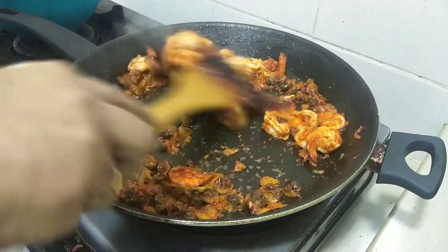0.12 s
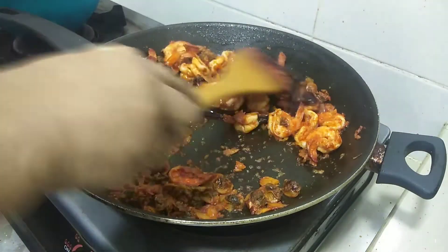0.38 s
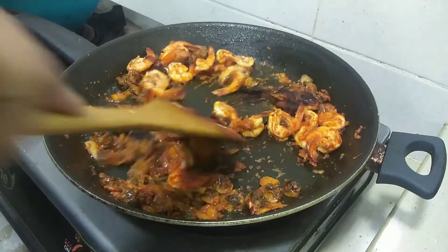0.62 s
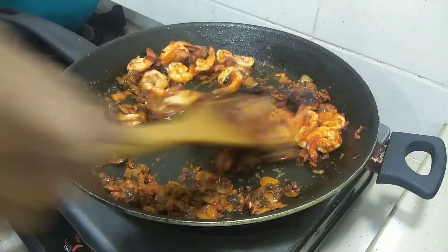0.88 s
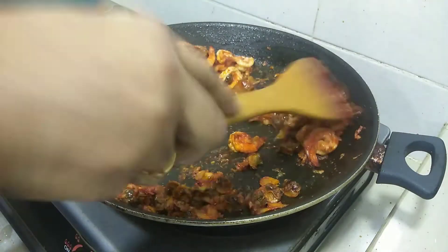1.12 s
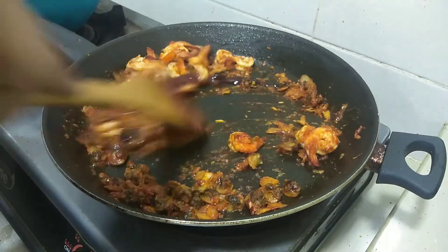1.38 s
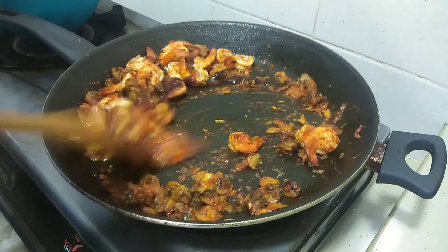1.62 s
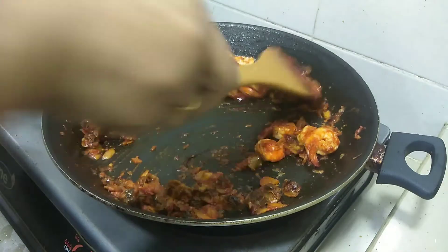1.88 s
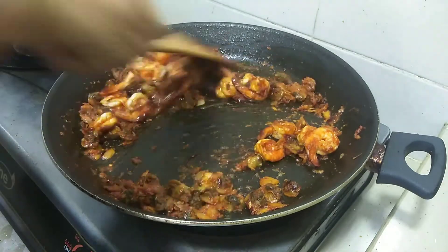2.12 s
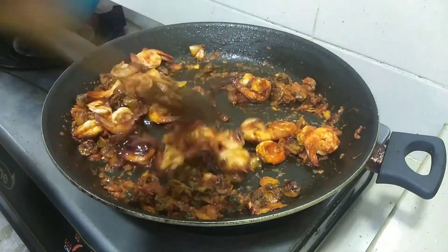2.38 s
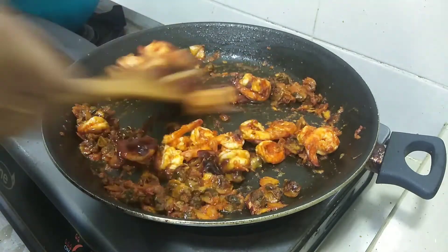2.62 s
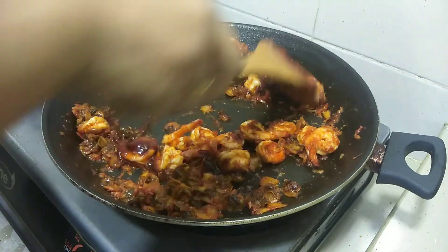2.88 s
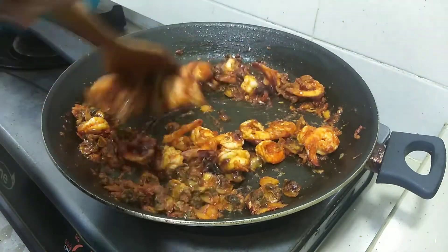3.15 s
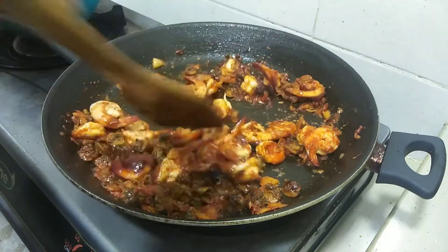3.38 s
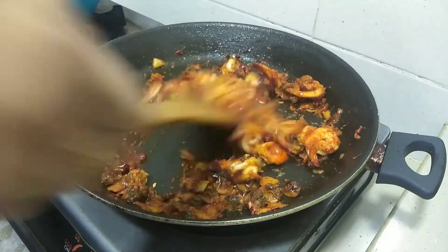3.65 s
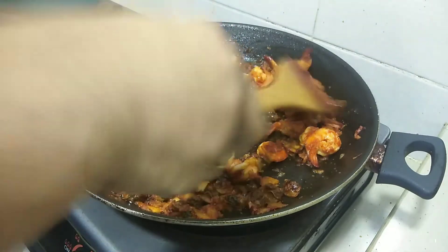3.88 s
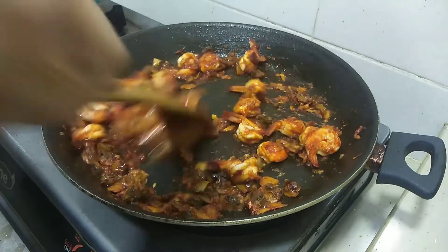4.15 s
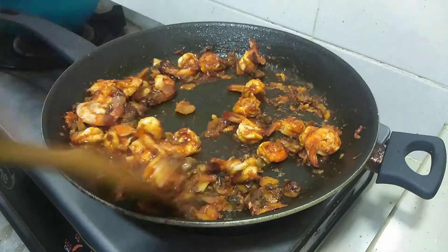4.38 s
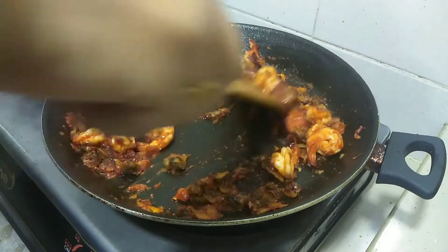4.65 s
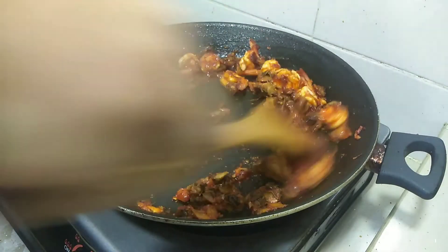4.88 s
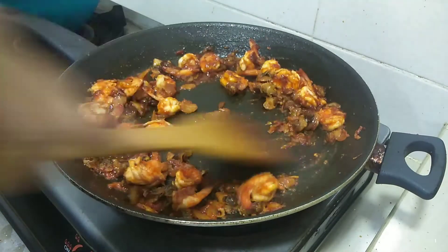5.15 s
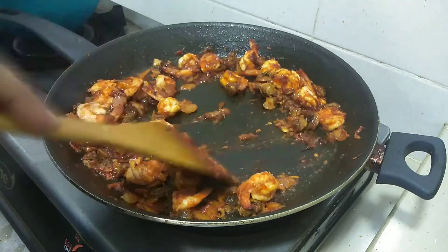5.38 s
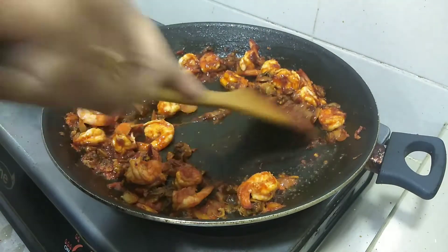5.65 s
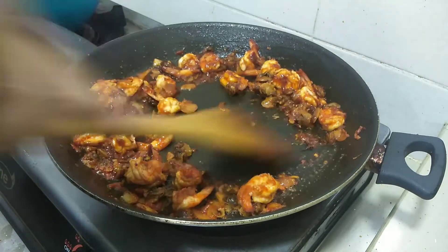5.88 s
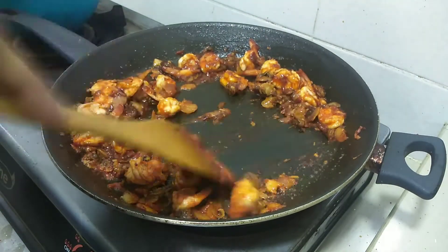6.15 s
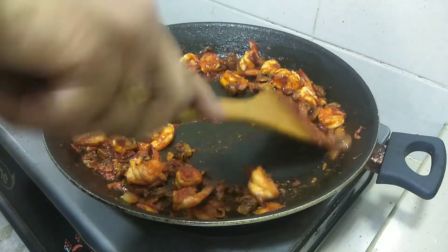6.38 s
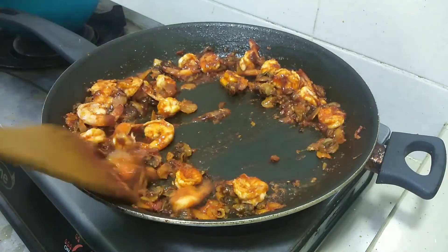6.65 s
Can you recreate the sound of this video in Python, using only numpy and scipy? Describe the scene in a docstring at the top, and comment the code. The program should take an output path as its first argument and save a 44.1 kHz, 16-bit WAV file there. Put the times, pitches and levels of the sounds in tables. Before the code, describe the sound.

Close, bright frying sputter runs throughout, swelling as food is turned; wood rubs the pan and knocks ring briefly over a faint low rumble.

```python
"""Seafood fries in a pan on a gas stove, heard close by through two ports in a tiled kitchen.
Hot fat crackles densely: bands of random bursts sputter partly together, partly each on its own, and swell
as food is turned. A wooden spatula scrapes, as coloured noise. The spatula landing, or the pan slamming on
the stove grid, knocks: briefly ringing modes, echoed by the walls.
Low noise shaped by room resonances rumbles beneath."""
import sys
import numpy as np
from scipy import signal
from scipy.fft import rfft, irfft
from scipy.io import wavfile
from scipy.ndimage import uniform_filter1d

SR = 44100
rng = np.random.default_rng(int(sys.argv[2]) if len(sys.argv) > 2 else 0)


def master_out(mix):
    """Clip the mix to full scale and print it as 16-bit PCM to the path in sys.argv[1]."""
    frames = np.transpose(np.atleast_2d(mix))
    ceiling = np.clip(frames, -1, 1)
    pcm = np.round(ceiling * 32767).astype(np.int16)
    wavfile.write(sys.argv[1], SR, pcm)


def gain_from_db(level_db):
    """Turn a decibel level (scalar or array-like) into a linear amplitude factor."""
    decades = np.asarray(level_db, float) / 20
    return 10 ** decades


N = 298557

# knocks of the pan: the spatula landing, or the pan slamming on the stove grid;
# levels are relative, the pitch is the one excited best:
# start_s, level_db, best_pitch_hz, spread_octaves, ring_length_factor
BLOWS = [(0.86, -20, 1190, 1.34, 0.72), (0.971, -24, 1490, 2.1, 0.15), (1.169, -16, 377, 1.96, 0.64),
         (1.199, -24, 387, 2.2, 0.54), (1.656, -13.5, 362, 1.97, 0.65), (1.706, -9, 1220, 1.65, 0.3),
         (1.729, -27, 358, 1.1, 0.26), (2.575, -16, 800, 1.2, 0.32), (2.624, -13.5, 1170, 1.34, 0.21),
         (3.008, -36.5, 600, 1.2, 0.22), (3.022, -26.5, 360, 0.38, 0.36), (3.596, -15, 360, 2.04, 0.76),
         (3.642, -8, 1250, 1.8, 0.13), (3.664, -24, 638, 1.5, 0.26), (4.461, -18, 360, 2.3, 0.28),
         (4.511, -8, 1230, 2.2, 0.2), (4.534, -24.5, 292, 2.2, 0.3), (4.818, -30, 570, 1.9, 0.19),
         (6.11, -23.5, 3200, 1.4, 0.16)]


def curves(table):
    """Columns of a table after its times, interpolated to one value a sample."""
    time_s, *columns = np.transpose(table)
    return [np.interp(np.arange(N) / SR, time_s, column) for column in columns]


def bins():
    """Frequencies of the spectrum lines in Hz, at least 1."""
    return np.maximum(np.arange(N // 2 + 1) * SR / N, 1)


def shape(points):
    """Gain on every spectrum line from (Hz, dB) points, interpolated over log frequency."""
    hz, db = np.transpose(points)
    return gain_from_db(np.interp(np.log(bins()), np.log(hz), db))


def colour(x, gain):
    """Filter by a gain on every spectrum line."""
    return irfft(rfft(x) * gain, N)


def unit(x):
    """Scale to rms 1."""
    return x / np.sqrt(np.mean(x ** 2))


def walk(rate_hz):
    """Random levels of about rms 1, held 1 / rate_hz and slewed twice."""
    hold = int(SR / rate_hz)
    steps = np.repeat(rng.standard_normal(N // hold + 1), hold)
    slewed = uniform_filter1d(uniform_filter1d(steps, hold), hold)
    return 1.44 * slewed[:N]


def crackle(spread_db):
    """Two unrelated streams of one tiny burst a sample, a few larger than the rest."""
    size = np.minimum(rng.exponential(size=(2, N)), 6.5)
    return rng.standard_normal((2, N)) * gain_from_db(spread_db * size)


def ports(pair):
    """Two unrelated streams heard as left and right: alike in the bass, unlike in the treble."""
    alike_hz = 925  # above this the two ports hear different things
    alike = 1 / (1 + (bins() / alike_hz) ** 2)
    mid = colour(pair[0], np.sqrt(1 + alike))
    side = colour(pair[1], np.sqrt(1 - alike))
    return np.array([mid + side, mid - side]) / np.sqrt(2)


def patchy(x, patchy_db):
    """Random gain patches in time and pitch make the noise uneven."""
    z = signal.stft(x, nperseg=1024)[2]
    patches = uniform_filter1d(rng.standard_normal(z.shape), size=3, axis=1)
    patches = uniform_filter1d(patches, size=2, axis=2)
    gain = gain_from_db(patchy_db * np.minimum(unit(patches), 2.2))
    varied = signal.istft(z * gain, nperseg=1024)[1][:, :N]
    return unit(varied) * np.sqrt(np.mean(x ** 2))  # overall level kept


def room(x, t60_s, damp_hz):
    """Tiled walls: a dense decaying echo, its treble damped."""
    t = np.arange(N) / SR
    envelope = 1000 ** (-t / t60_s) * np.minimum(t / 0.0036, 1)
    tail = ports(rng.standard_normal((2, N)) * envelope)[:, :SR // 2]
    tail = signal.lfilter(*signal.butter(1, damp_hz, fs=SR), tail)
    tail = unit(tail) / np.sqrt(SR / 2)  # unit energy
    return signal.fftconvolve(x, tail, axes=1)[:, :N]


def swells():
    """Power of the rumble: a wavering bed plus smooth humps."""
    # brief swells, length at half amplitude: middle_s, length_s, level_db
    humps = [(.66, .08, -41), (0.767, 0.029, -41), (0.965, .07, -41.5), (1.723, 0.072, -41),
             (2.547, 0.058, -39), (2.675, 0.054, -40), (3.22, 0.079, -39), (3.36, 0.063, -46),
             (3.67, 0.096, -31.5), (4.494, 0.14, -35), (4.627, 0.052, -39), (4.807, 0.035, -39),
             (4.94, 0.049, -38), (5.35, 0.12, -40.5), (5.825, 0.079, -43), (5.937, 0.041, -38),
             (6.36, .09, -40)]
    bed_db, waver_db, wavers_per_s = -45, 3, 18
    middle_s, length_s, level_db = np.transpose(humps)[:, :, None]
    phase = np.clip((np.arange(N) / SR - middle_s) / (2 * length_s), -.5, .5)
    hump = np.cos(np.pi * phase) ** 2
    bed = gain_from_db(bed_db + waver_db * walk(wavers_per_s))
    return bed ** 2 + np.sum((gain_from_db(level_db) * hump) ** 2, axis=0)


def rumble():
    """Low noise that the room's resonances pick out, the same in both ports."""
    # room resonances, relative levels: pitch_hz, width_hz, level_db
    resonances = [(85.7, 12.7, 2.5), (120.2, 30.3, -3.5), (170, 20.5, -10), (60, 32, -27), (261, 32, -17.5)]
    power = 0
    for pitch_hz, width_hz, level_db in resonances:
        detune = 2 * (bins() - pitch_hz) / width_hz
        power = power + gain_from_db(level_db) ** 2 / (1 + detune ** 2) ** 1.48
    low = unit(colour(rng.standard_normal(N), np.sqrt(power)))
    loudness = np.sqrt(uniform_filter1d(low ** 2, int(.09 * SR)))
    even = low / loudness ** 0.64  # a steady source keeps it even
    return unit(even) * np.sqrt(swells())


def drag():
    """Wood and food rubbing the pan floor in uneven slips: crackling noise with a wavering level."""
    # scrape spectrum, relative: pitch_hz, level_db_per_hz
    scrape = [(150, -26), (260, -4.5), (460, -10), (600, -6), (890, -11.5), (1280, -5.5), (1700, -15.5),
              (3000, -13)]
    level_db, wander_db = -40, .6
    slips = crackle(2.4) * gain_from_db(2.6 * walk(30))
    rub = unit(colour(slips, shape(scrape)))
    return patchy(ports(rub), 5.3) * gain_from_db(level_db + wander_db * walk(3.04))


def knocks():
    """Each blow cracks dryly, then it and its chatter on the stove grid ring the pan modes it excites best."""
    # pan modes, relative levels, decay before each blow shortens it: pitch_hz, level_db, t60_s
    pan_modes = [(122, -24, 0.1), (207, -11, 0.04), (269, -21, 0.068), (358, -9, 0.45), (438, -12, 0.24),
                 (558, -18, 0.078), (630.4, -5.5, 0.22), (732, 3, 0.046), (939, -13, 0.43), (1007, -6, 0.2),
                 (1072, 6, 0.022), (1247, -0.5, 0.1), (1395, 0.5, 0.065), (1600, -3.5, 0.045),
                 (1888, 5.5, 0.052), (2183, 8, 0.042), (2690, 4, .08), (3160, 11, 0.058),
                 (3691, 19.5, 0.011), (4150, 12.5, 0.079), (4886, 5, 0.29), (5180, 4, 0.19),
                 (6200, 10, 0.092), (6640, 12, 0.045)]
    delay_s = .0015  # every blow sounds this long after its listed start
    chatter_s = 0.014  # decay of the pan's rattle on the stove grid
    hz, mode_db, t60_s = np.transpose(pan_modes)[:, :, None]
    t, out = np.arange(int(.3 * SR)) / SR, np.zeros((2, N + SR))
    # a wide pan reaches the two ports with phases that part as pitch rises, neighbouring modes opposite ways
    lean = (-1) ** np.arange(len(pan_modes))[:, None] * np.minimum(hz / 1700, .68)
    part = np.array([lean, -lean])
    for start_s, level_db, best_hz, spread_octaves, ring in BLOWS:
        away = np.log2(hz / best_hz) / spread_octaves
        # a hard edge hardly moves the lower modes
        gain = gain_from_db(mode_db - np.where(away < 0, 15, 7.2) * away ** 2)
        # extra body near the best pitch
        gain = gain * gain_from_db(4.8 * np.exp(-(np.log2(hz / best_hz) / 0.24) ** 2))
        # every mode is damped hard during contact, then the pan rings on, its low modes shortened least
        ringing = 1000 ** (-t / (t60_s * ring ** np.minimum(hz / 900, 1)))
        touch = np.exp(-t / 0.00089)
        # food settling back on the pan stills it
        fade = (ringing + touch) * np.exp(-(t / 0.051) ** 2)
        phase = 1.03 * rng.standard_normal(hz.shape)  # modes set off a little out of step
        struck_hz = hz * (1 + 0.0061 * rng.standard_normal(hz.shape))  # food shifts the modes a little
        modes = np.sum(gain * np.sin(2 * np.pi * struck_hz * t + phase + part) * fade, axis=1)
        rattle_db = -29 + 4.7 * np.minimum(rng.exponential(size=len(t)), 4)
        chatter = rng.standard_normal(len(t)) * gain_from_db(rattle_db) * np.exp(-t / chatter_s)
        chatter[0] = 1  # the blow itself
        push = np.minimum(t * best_hz / 0.41, 1)  # a duller blow is a softer, longer push
        blow = signal.fftconvolve(modes * push, chatter[None], axes=1)[:, :len(t)]
        i = int((start_s + delay_s) * SR)
        out[:, i:i + len(t)] += unit(blow) * gain_from_db(level_db - 19)
    highpass = signal.butter(2, 110, "high", fs=SR, output="sos")
    return signal.sosfilt(highpass, out[:, :N])


def flare():
    """Power of the hiss that blows, bright ones most, jolt out of the fat: a quick rise, a slower fall."""
    hiss_db, rise_s, fall_s = -20.5, 0.0057, 0.039  # hiss_db is against the blow's listed level
    dull_hz = 800  # blows much duller than this jolt little
    start_s, level_db, best_hz = np.transpose(BLOWS)[:3, :, None]
    t = np.maximum(np.arange(N) / SR - start_s, 0)
    jolt = gain_from_db(level_db + hiss_db) ** 2 / (1 + (dull_hz / best_hz) ** 4)
    return np.sum(jolt * (1 - np.exp(-t / rise_s)) * np.exp(-t / fall_s), axis=0)


def sizzle():
    """Steam bursting out of hot fat; bands sputter partly together, partly each on its own."""
    # frying as food is turned, relative levels, spray against its own mean: time_s, sizzle_db, spray_db
    frying = [(0, -37.5, -3.5), (.3, -37.5, -1), (.47, -34, -2.5), (.7, -38.5, 0), (1.05, -35, 0.5),
              (1.6, -35.5, 1), (1.9, -37, -1), (2.35, -34.5, 0), (2.5, -37, -2), (3.15, -35, -2.5),
              (3.5, -39, -2), (3.8, -37.5, -0.5), (4.15, -35.5, 0.5), (4.45, -38.5, -1.5), (4.9, -35, -2),
              (5.7, -37.5, 1.5), (5.98, -37.5, 0), (6.03, -40, -1), (6.77, -41, -1)]
    # sizzle as the microphone colours it, relative: pitch_hz, level_db_per_hz
    sizzle_points = [(400, -26), (1000, -15), (1700, -4), (2500, 0), (3300, 1.5), (4300, 4), (5200, 2),
                     (6400, 2.5), (7200, -5.5), (8100, -11), (10000, -5.5), (12500, -1), (14600, 3.5),
                     (15500, 5.5)]
    fry_db, spray_db = curves(frying)
    fry_db = 10 * np.log10(gain_from_db(fry_db) ** 2 + flare())
    spray_db = spray_db - np.mean(spray_db)
    balance_db = -.3 + .5 * walk(2.78)  # the busiest spot of the pan shifts left and right
    spectrum, out, shared = shape(sizzle_points), 0, walk(14)
    for hz in 500 * 2 ** np.arange(0, 5.5, .5):
        band = np.cos(np.pi * np.clip(np.log2(bins() / hz), -.5, .5))
        spray = np.clip(2 * np.log2(hz / 8000), 0, 1)  # the top bands follow the fine spray
        sputter_db = 0.87 * shared + 1.18 * walk(21.76) + spray * 0.19 * walk(60)
        level_db = fry_db + spray * spray_db + sputter_db
        out = out + gain_from_db(level_db) * colour(crackle(3.21), band * spectrum)
    gain = gain_from_db(5.5) / np.sqrt(np.mean(spectrum ** 2))
    balance = gain_from_db(np.array([balance_db, -balance_db]) / 2)
    return patchy(ports(out), 3.94) * gain * balance


def scene():
    """All sources; the knocks also echo off the walls."""
    hits = knocks()
    echo = gain_from_db(-10.5) * room(hits, t60_s=0.38, damp_hz=6200)
    return rumble() + drag() + hits + echo + sizzle()


def top_cut(x):
    """Nothing passes above the cut-off."""
    return signal.sosfilt(signal.butter(12, 16870, fs=SR, output="sos"), x)


def record(dry):
    """Soft clipping; the left port hears more treble; the top is cut steeply."""
    # left over right port: pitch_hz, level_db
    left_lift = [(3500, .6), (6500, 2.5), (8100, 5), (15000, 9)]
    top_hz = 15550
    rounded = 0.93 * np.tanh(dry / 0.97)  # the hardest blows are rounded off softly
    lift = np.sqrt(shape(left_lift))  # half the dB up on the left, half down on the right
    heard = colour(rounded, np.array([lift, 1 / lift]) * (bins() < top_hz))
    return top_cut(heard)


dry = scene()
out = record(dry)
master_out(out)
```